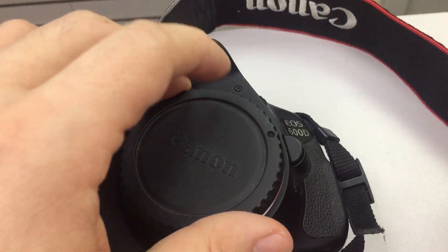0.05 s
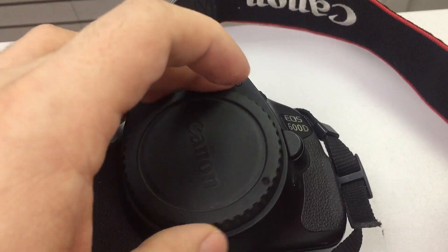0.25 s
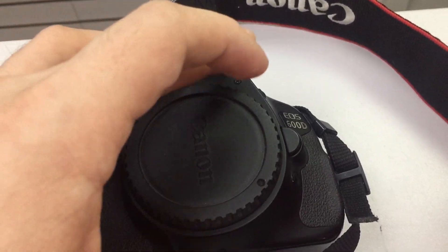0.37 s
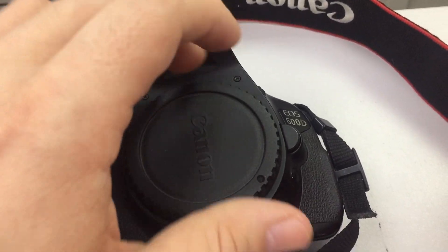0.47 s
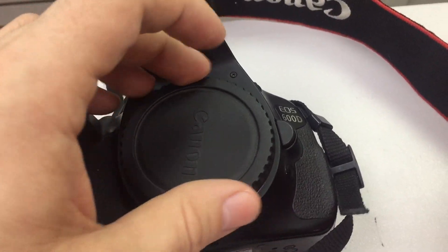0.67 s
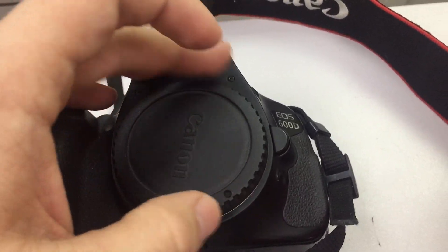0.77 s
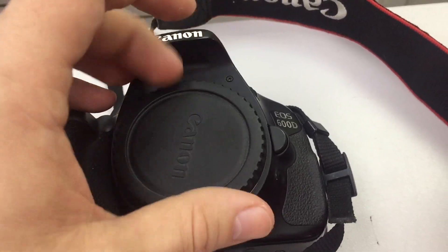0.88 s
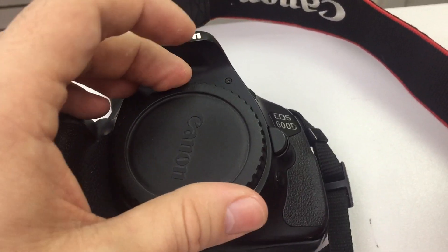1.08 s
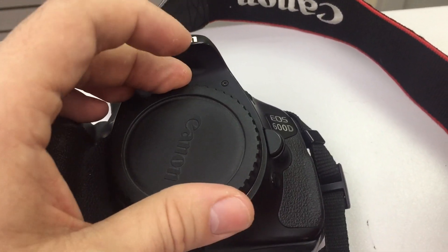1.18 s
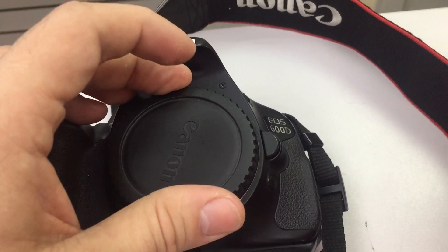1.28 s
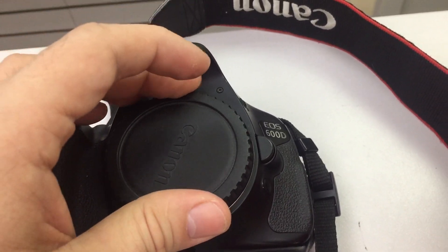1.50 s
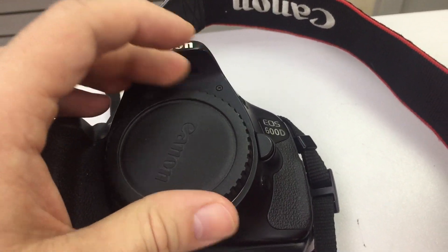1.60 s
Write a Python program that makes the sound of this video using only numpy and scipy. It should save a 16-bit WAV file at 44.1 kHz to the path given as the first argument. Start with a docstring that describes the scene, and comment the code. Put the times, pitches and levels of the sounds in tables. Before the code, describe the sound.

A plastic cap is twisted onto a camera mount, heard close in a small room. Faint scraping starts at 0.1 s; sharp hollow clicks and gritty scrapes cluster from 0.22 to 0.42 s, loudest near 0.25. Soft fingertip taps follow at 0.67, skin rubbing and nail ticks around 0.75-0.95, low dull bumps near 1.0-1.2, and a faint tap at 1.55, over quiet room air and hum.

```python
"""Cap twisted onto a camera

A hand twists a plastic cap onto a camera's bayonet mount, close to a phone in a small room.
Its lugs click by ringing short plastic notes; scrape, skin and hiss are showers of random grains.
Finger taps, nail ticks and the rocking camera add damped notes and short noise bursts.
Under them lie low filtered noise for the hand, soft room air and a faint steady hum."""
import sys
import numpy as np
from scipy import signal
from scipy.fft import rfft, irfft, next_fast_len
from scipy.io import wavfile

SR = 44100
rng = np.random.default_rng(int(sys.argv[2]) if len(sys.argv) > 2 else 0)


def bounce(signal):
    """Save signal as a 16-bit WAV file at the path given by the first command-line argument."""
    frames = np.transpose(np.atleast_2d(signal))
    limited = np.clip(frames, -1, 1)
    pcm = np.round(limited * 32767).astype(np.int16)
    wavfile.write(sys.argv[1], SR, pcm)


N = 72765
T = np.arange(N) / SR

# centres of the five pitch regions in which a click is weighted [f/Hz]
REGION_HZ = (680, 1650, 3200, 5300, 10500)
# noise crack beside the notes, one per region [level/dB]
CRACK_DB = (-13, -3, -14, -2.5, -4)
# notes of the loose cap and mount [f/Hz, level/dB, t60/s before each click's length factor]
LOOSE_NOTES = [(555, -4.5, .04), (668, -2, .04), (775, -4, .03), (935, -1.5, .05), (1230, -9, .04),
               (1530, -8, .03), (1662, -3, .035), (1822, -7, .035), (1985, -3, .035), (2830, -10, .03),
               (3410, -1, .04), (4680, -8, .035), (5930, -4, .04), (8000, -12, .02), (9050, -8, .03),
               (9800, -7, .02), (10700, -7, .02), (11400, -9, .02), (12700, -10, .02)]
# notes of the cap locked in the mount [f/Hz, level/dB, t60/s before each click's length factor]
LOCKED_NOTES = [(662, -3, 0.043), (910, -2.5, 0.038), (1254, -5, 0.022), (1584, -14, .02),
                (2078, -2.5, 0.033), (2474, -15.5, .02), (3063, -1, 0.023), (4116, -7.5, 0.021),
                (5747, 0.5, 0.034), (8550, -16, .02)]
LOCKED_S = .6  # clicks from here on use the locked notes
# clicks of the lugs, and later of fingers and nails on the locked cap
# [t/s, level/dB in each of the five regions, length factor, rise t60/s]
CLICKS = [(.112, -51.5, -57.5, -58.5, -79, -65, 1.1, 0.0017),
          (.2195, -43, -66, -55.5, -76, -57, 1.06, 0.004), (.2455, -67, -53, -60, -69, -54, .4, 0.00087),
          (0.2557, -28.5, -27, -48, -42, -39, 0.33, 0.00055),
          (0.2599, -37, -34.5, -52, -47, -46.5, 0.6, 0.0019), (.2643, -42.5, -44, -45, -72, -67, 2.1, .002),
          (.3168, -35, -43.5, -43, -77, -73, 0.36, 0.0052), (0.321, -40, -70, -37, -48, -71, 0.81, 0.0025),
          (.355, -37, -30, -48, -42, -42.5, 0.41, 0.00014),
          (0.3607, -41, -41.5, -58, -54.5, -64, 0.86, 0.0057),
          (.3787, -33.5, -50, -31.5, -48, -51, 0.59, 0.00044),
          (0.3854, -28, -66, -53, -58, -70, 0.1, 0.0045),
          (0.4069, -27, -48, -37, -40.5, -52.5, 0.31, 0.003),
          (.4205, -30.5, -46, -74, -70, -74, 0.18, 0.00022),
          (0.7279, -67, -58.5, -49, -60.5, -64, 0.75, 0.00056),
          (.731, -47, -53, -66, -76, -68, 0.97, 0.0011), (0.782, -51, -68, -55, -63.5, -50.5, 0.86, 0.0079),
          (0.7926, -39.5, -50.5, -61.5, -75, -72, 0.78, 0.00074),
          (1.1668, -52, -56, -72, -77, -71, 0.48, 0.0005)]
DETUNE, STRIKE_SPREAD_DB = .009, 1.5  # random spread of each note: fraction of pitch, dB
CRACK_T60_S = 0.038  # times the click's length factor


def clicks():
    """Each click rings the cap and adds a crack; the contact point sets the balance of pitches."""
    out = np.zeros(N)
    edges = (400, 1100, 2100, 4000, 7000, 14000)  # Hz
    bands = [signal.butter(3, edges[k:k + 2], "band", fs=SR, output="sos") for k in range(len(REGION_HZ))]
    for at, *levels, length, rise in CLICKS:
        notes = LOOSE_NOTES if at < LOCKED_S else LOCKED_NOTES
        for k, (hz, db, t60) in enumerate(notes):
            weight_db = np.interp(np.log(hz), np.log(REGION_HZ), levels)
            weight_db += STRIKE_SPREAD_DB * rng.standard_normal()
            note = ring(hz * (1 + DETUNE * rng.standard_normal()), t60 * length)
            sign = (-1) ** k
            add(out, at, sign * amp(db + weight_db) * blow(note * onset(rise)))
        for band, db, crack_db in zip(bands, levels, CRACK_DB):
            crack = colour(burst(CRACK_T60_S * length) * onset(rise), SCRAPE_COLOUR)
            add(out, at, amp(db + crack_db) * blow(signal.sosfilt(band, crack)))
    return out


# loudness of the cap scraping round [t/s, level/dB]
SCRAPE = [(.04, -68.5), (.067, -66), (.071, -56), (.087, -57), (.105, -60.5), (.12, -54), (.14, -117),
          (.203, -69), (.222, -46), (.235, -47), (.252, -32), (.275, -49), (.305, -46), (.325, -35.5),
          (.345, -49), (.368, -43), (.375, -44), (.405, -48), (.43, -52.5), (.47, -69.5), (.6, -87)]
# tone of the scrape, also given to the click cracks [f/Hz, level/dB]
SCRAPE_COLOUR = [(200, -19), (380, -10), (620, 0), (1000, -5), (1380, -4.5), (1650, -2.5), (1950, -6),
                 (2250, -7), (3000, -15.5), (3420, -11.5), (3850, -28), (5200, -22.5), (5900, -16.5),
                 (7000, -26.5), (8400, -22), (9100, -16.5), (10000, -23), (12700, -22), (16000, -24)]


def scrape():
    """The cap slides in the mount: many small slips partly ring the loose cap."""
    return friction(SCRAPE, SCRAPE_COLOUR, LOOSE_NOTES, 0.87)


# loudness of the fingers rubbing as they shift [t/s, level/dB]
RUB = [(.71, -76), (.745, -59.5), (.772, -71), (.787, -46.5), (.81, -71), (.835, -55), (.855, -53),
       (.875, -50), (.89, -65.5), (.92, -60), (.95, -65), (.99, -65.5), (1.03, -67.5), (1.12, -73),
       (1.165, -59.5), (1.21, -77), (1.62, -71), (1.65, -62)]
# tone of the rubbing [f/Hz, level/dB]
RUB_COLOUR = [(200, -19), (450, -14), (780, -4.5), (890, -3.5), (1080, -7.5), (1700, -11), (3100, -12.5),
              (4000, -16), (5600, -17), (7500, -21), (11500, -23.5), (16000, -34)]


def rubbing():
    """Skin catches and slips in grains that partly ring the locked cap."""
    return friction(RUB, RUB_COLOUR, LOCKED_NOTES, 0.64)


# loudness of the airy hiss of light sliding contact [t/s, level/dB]
HISS = [(.04, -84), (.078, -64.5), (.118, -66.5), (.14, -82), (.21, -81), (.218, -55), (.25, -46.5),
        (.275, -59), (.45, -79), (.72, -80), (.75, -70), (.785, -60), (.81, -76), (.88, -65), (.92, -90),
        (1.15, -76), (1.161, -55.5), (1.167, -76.5), (1.25, -85.5), (1.62, -88.5), (1.65, -68)]
# tone of the hiss, mostly treble [f/Hz, level/dB]
HISS_COLOUR = [(1000, -43.5), (4500, -6.5), (5400, -10), (5900, -4.5), (6600, -8), (8400, -8.5),
               (9100, -5.5), (10000, -14.5), (11500, -9.5), (12600, -7.5), (14000, -12.5), (15500, -5.5)]


def hiss():
    """Light sliding contact makes treble grains, with the cap's high resonances in their tone."""
    return unit(colour(grains(), HISS_COLOUR)) * curve(HISS)


# faint squeak of the cap [t/s of its peak, bell width/s, f/Hz, level/dB]
SQUEAK = (.556, .008, 4850, -68)


def squeak():
    """A narrow strip of noise swells and fades like a small squeak."""
    at, width, hz, db = SQUEAK
    return amp(db) * swell(at, width) * unit(narrow(rng.standard_normal(N), hz, 0.14))


# dull fingertip taps [t/s, level/dB, f/Hz, t60/s, overtone level/dB against it, softness cut-off f/Hz]
TAPS = [(0.6675, -43, 817, 0.008, -9, 2120), (.6822, -51.5, 683, 0.011, -12, 1488),
        (1.5475, -51.5, 804, 0.012, -1, 12000)]
# overtones of a tap [f/Hz, level/dB, t60/s]
TAP_OVERTONES = [(1180, -0.5, 0.023), (1744, -8.5, 0.035), (2767, -18, 0.0045), (4230, -13, 0.006),
                 (7500, -21.5, 0.0027)]
TAP_RISE_S = 0.013  # t60 of the build-up


def taps():
    """Fingertips knock one damped note and overtones out of the housing; soft skin dulls the overtones."""
    out = np.zeros(N)
    for at, db, hz, t60, overtone_db, soft_hz in TAPS:
        skin = signal.butter(2, min(soft_hz, SR * .45), fs=SR, output="sos")
        add(out, at, amp(db) * blow(ring(hz, t60) * onset(TAP_RISE_S)))
        add(out, at, amp(db + overtone_db) * signal.sosfilt(skin, knock(TAP_OVERTONES)))
    return out


# a nail on the plastic [t/s, crack level/dB, ring f/Hz, ring level/dB against the crack, chatter t60/s]
TICKS = [(0.8698, -64, 4900, 3, 0.016), (0.8918, -49, 3260, -6.5, 0.008), (0.9264, -47, 4560, 2, 0.016),
         (1.1335, -53.5, 5700, -8.5, 0.012)]
# tone of the crack [f/Hz, level/dB]
TICK_COLOUR = [(200, -47), (700, 6.5), (1800, 4.5), (5500, 2), (8000, -6), (16000, -10.5)]
TICK_CHATTER = .9  # strength against the first push
TICK_RING_WIDTH = 0.26  # band width as a log ratio, about a fraction of its centre


def ticks():
    """Hard, tiny contacts: a crack with one short, broad ring."""
    out = np.zeros(N)
    for at, db, hz, ring_db, t60 in TICKS:
        force = contact(t60, TICK_CHATTER)
        crack = blow(colour(force, TICK_COLOUR))
        ringing = blow(narrow(force, hz, TICK_RING_WIDTH))
        add(out, at, amp(db) * (crack + amp(ring_db) * ringing))
    return out


# the camera rocks on the table [t/s, knock level/dB, thump level/dB, thump f/Hz, thump t60/s]
ROCKS = [(.006, -58, -49.5, 192.6, 0.28), (0.259, -50, -39, 188.4, 0.12), (0.9976, -51, -44, 169.4, 0.096),
         (1.0612, -48, -41.5, 174, 0.15), (1.079, -58.5, -44, 127.5, 0.34), (1.1893, -52.5, -47, 187, 0.11)]
# notes of the camera body [f/Hz, level/dB, t60/s]
BODY_NOTES = [(564, -5.5, 0.019), (796, -1.5, 0.049), (1180, 0, 0.016), (1403, -5.5, 0.0054),
              (2430, -22, .012), (3200, -8, 0.011), (4100, -20, 0.014)]
THUMP_RISE_S = 0.0082  # t60 of the build-up


def rocking():
    """The camera body knocks and the table answers with a low thump."""
    out = np.zeros(N)
    for at, knock_db, thump_db, thump_hz, thump_t60 in ROCKS:
        add(out, at, amp(knock_db) * knock(BODY_NOTES))
        add(out, at, amp(thump_db) * blow(ring(thump_hz, thump_t60) * onset(THUMP_RISE_S)))
    return out


# loudness of the low handling rumble [t/s, level/dB]
HANDLING = [(0, -69), (.09, -56.5), (.18, -74), (.245, -66), (.275, -72), (.32, -56.5), (.42, -58),
            (.5, -70.5), (.8, -68.5), (.87, -57.5), (.95, -64.5), (1.045, -55), (1.09, -53), (1.16, -65.5),
            (1.21, -55.5), (1.3, -74)]
# tone of the rumble [f/Hz, level/dB]
HANDLING_COLOUR = [(25, -22.5), (52, -7), (90, -15), (130, -7.5), (185, -1.5), (260, -15.5), (500, -30),
                   (2000, -64)]
# the hand's weight shifts on the table [t/s of the peak, bell width/s, f/Hz, level/dB]
SWAYS = [(0.86, 0.019, 65, -56), (1.105, 0.025, 50, -61), (1.209, 0.019, 56.7, -60)]


def handling():
    """The hand rumbles as low noise, and the table sways under its weight in brief low tones."""
    out = unit(colour(rng.standard_normal(N), HANDLING_COLOUR)) * curve(HANDLING)
    for at, width, hz, db in SWAYS:
        tone = unit(np.sin(2 * np.pi * hz * (T - at)))
        out += amp(db) * swell(at, width) * tone
    return out


# tone of the room air [f/Hz, level/dB]
AIR_COLOUR = [(15, -36.5), (25, -15), (97, -7), (166, -7.5), (190, -7), (363, -12), (394, -18.5),
              (560, -23), (775, -37.5), (887, -21.5), (1400, -25.5), (2840, -25.5), (4870, -32),
              (5880, -31), (16000, -41.5)]
AIR_DB, HUM_HZ, HUM_DB = -70, 91.5, -74


def background():
    """Room air is steady filtered noise; the faint hum is one sine tone."""
    air = amp(AIR_DB) * unit(colour(rng.standard_normal(N), AIR_COLOUR))
    hum = amp(HUM_DB) * unit(np.sin(2 * np.pi * HUM_HZ * T))
    return air + hum


EARLY_DB, EARLY_T60_S = -16.5, 0.074
TAIL_DB, TAIL_T60_S = -17.5, 0.22
ROOM_DELAY_S = .004


def room(x):
    """Dying noise echoes the sound: quick reflections from table and hand, and a faint longer tail."""
    tail_colour = [(100, -7), (600, 1), (2000, 4.5), (4800, 5.0), (9000, -9.0), (16000, 4.0)]  # f/Hz, level/dB
    tail = colour(burst(TAIL_T60_S, size=22050), tail_colour)
    early = burst(EARLY_T60_S, size=22050)
    echo = amp(TAIL_DB) * tail / np.linalg.norm(tail)
    echo += amp(EARLY_DB) * early / np.linalg.norm(early)
    out = x.copy()
    add(out, ROOM_DELAY_S, signal.fftconvolve(x, echo)[:N])
    return out


def friction(levels, points, notes, ringing):
    """Grains of a sliding contact partly ring the cap's notes, all struck equally hard."""
    slips = grains()
    cap = sum((-1) ** k * ring(hz, t60) for k, (hz, _, t60) in enumerate(notes))
    rung = signal.fftconvolve(slips, cap)[:N]
    return unit(colour(slips + ringing * unit(rung), points)) * curve(levels)


GRAINS_PER_S, GRAIN_SPREAD_DB = 4000, 2.5  # average rate; scale of the random boost
JUDDER_HZ, JUDDER_DB = 210, 3.6  # new random levels per second; their spread


def grains():
    """Dense stick-slip grains come in uneven catches, as a random judder moves their level."""
    happens = rng.random(N) < GRAINS_PER_S / SR
    boost_db = GRAIN_SPREAD_DB * np.minimum(rng.exponential(size=N), 4)
    slips = happens * rng.standard_normal(N) * amp(boost_db)
    steps = np.clip(rng.standard_normal(N), -2, 2)
    judder = np.interp(T * JUDDER_HZ, np.arange(N), steps)
    return unit(slips * amp(JUDDER_DB * judder))


TICK_RISE_S = 0.0005  # t60 of the chatter's build-up


def contact(t60, chatter):
    """One sharp push followed by the chatter of rough surfaces."""
    force = burst(t60) * onset(TICK_RISE_S)
    force = chatter * force / np.linalg.norm(force)
    force[0] += 1
    return force


KNOCK_CHATTER, CHATTER_T60_S = .7, .012  # strength against the first push; fade
KNOCK_DETUNE, KNOCK_RISE_S = .025, 0.0015  # random fraction of pitch; t60 of the build-up


def knock(notes):
    """A rough contact rings a set of notes; each note's pitch varies a little at random."""
    rung = 0
    for k, (hz, db, t60) in enumerate(notes):
        note = ring(hz * (1 + KNOCK_DETUNE * rng.standard_normal()), t60)
        rung = rung + (-1) ** k * amp(db) * blow(note * onset(KNOCK_RISE_S))
    rough = signal.fftconvolve(rung, contact(CHATTER_T60_S, KNOCK_CHATTER))[:len(rung)]
    return rough * np.linalg.norm(rung) / np.linalg.norm(rough)


def amp(db):
    """Turn decibels into gain."""
    return 10 ** (np.asarray(db) / 20)


def unit(x):
    """Scale to rms 1."""
    return x / np.sqrt(np.mean(x ** 2))


def blow(x):
    """Scale a short sound to the energy of 10 ms at rms 1."""
    return x / np.sqrt(np.sum(x ** 2) / (SR / 100))


def fade(t60, size=8192):
    """Die away exponentially, by 60 dB in t60 seconds."""
    return np.exp(-np.log(1000) * T[:size] / max(t60, 1e-4))


def onset(rise, size=8192):
    """Let a contact build up instead of starting at once."""
    return (1 - fade(rise, size)) ** 2


def swell(at, width):
    """Rise and fall like a bell curve."""
    return np.exp(-.5 * ((T - at) / width) ** 2)


def ring(hz, t60, size=8192):
    """One struck note: a sine that dies away."""
    return blow(np.sin(2 * np.pi * hz * T[:size]) * fade(t60, size))


def burst(t60, size=8192):
    """Noise that dies away."""
    return rng.standard_normal(size) * fade(t60, size)


def narrow(x, hz, width):
    """Keep a band around hz; width is the log ratio of its edges."""
    edges = [hz * np.exp(-width / 2), hz * np.exp(width / 2)]
    return signal.sosfilt(signal.butter(2, edges, "band", fs=SR, output="sos"), x)


def colour(x, points):
    """Shape the tone through (f/Hz, level/dB) points, with no sound ahead of its cause."""
    hz, db = np.array(points, float).T
    n = 2 * next_fast_len(len(x))
    bins_hz = np.arange(n // 2 + 1) * SR / n
    gain = amp(np.interp(np.log(bins_hz + 1), np.log(hz), db))
    # fold the cepstrum forward in time: this gives the minimum-phase filter
    cepstrum = irfft(np.log(gain))
    cepstrum[1:n // 2] *= 2
    cepstrum[n // 2 + 1:] = 0
    return irfft(rfft(x, n) * np.exp(rfft(cepstrum)))[:len(x)]


def curve(points):
    """Gain over time through (t/s, level/dB) points."""
    return amp(np.interp(T, *np.array(points).T))


def add(out, at, x):
    """Mix a sound in at a time in seconds."""
    i = max(int(at * SR), 0)
    out[i:i + len(x)] += x[:N - i]


def scene():
    """Cap, fingers and camera in the room; a low cut keeps clicks and taps thin and free of bass."""
    low_cut = signal.butter(3, 362, "high", fs=SR, output="sos")  # Hz
    thin_contacts = signal.sosfilt(low_cut, clicks() + taps())
    sliding = scrape() + rubbing() + hiss() + squeak()
    return (room(thin_contacts + sliding + ticks() + rocking()) + handling() + background())[None]


LOW_CUT_HZ, TOP_HZ = 42, 15850


def record(dry):
    """The phone cuts the deep bass and the top."""
    thin = signal.sosfilt(signal.butter(4, LOW_CUT_HZ, "high", fs=SR, output="sos"), dry)
    return signal.sosfilt(signal.ellip(10, .2, 70, TOP_HZ, fs=SR, output="sos"), thin)


dry = scene()
out = record(dry)
bounce(out)
```